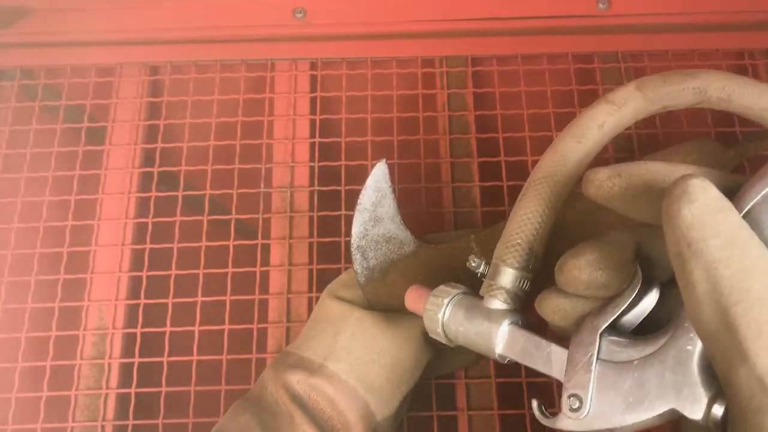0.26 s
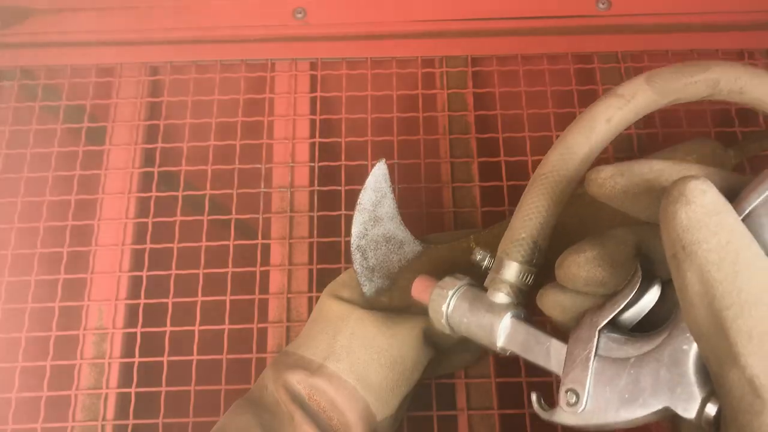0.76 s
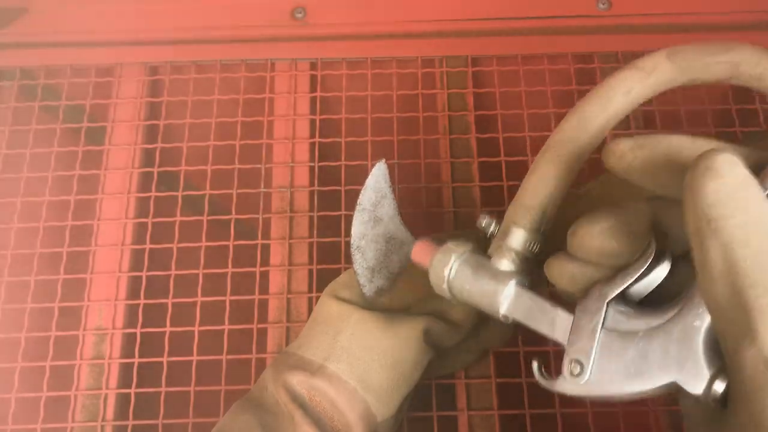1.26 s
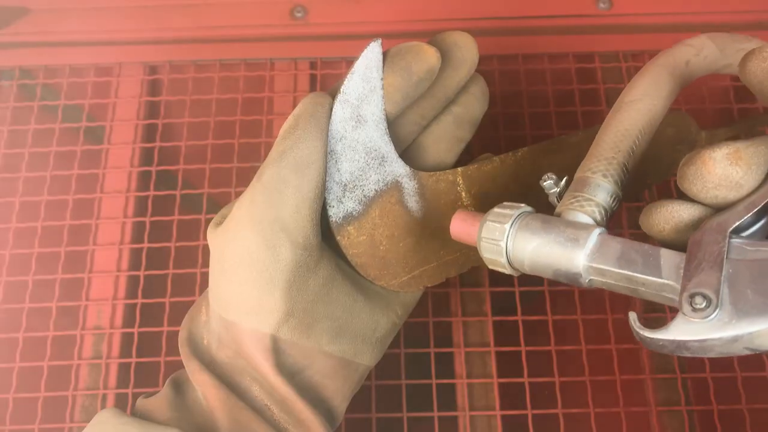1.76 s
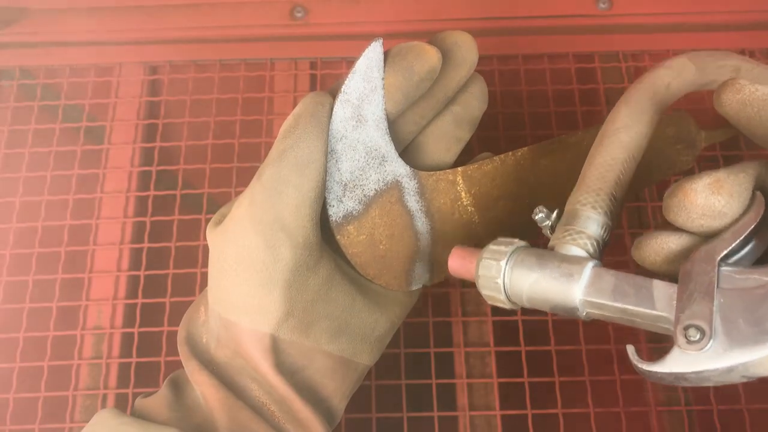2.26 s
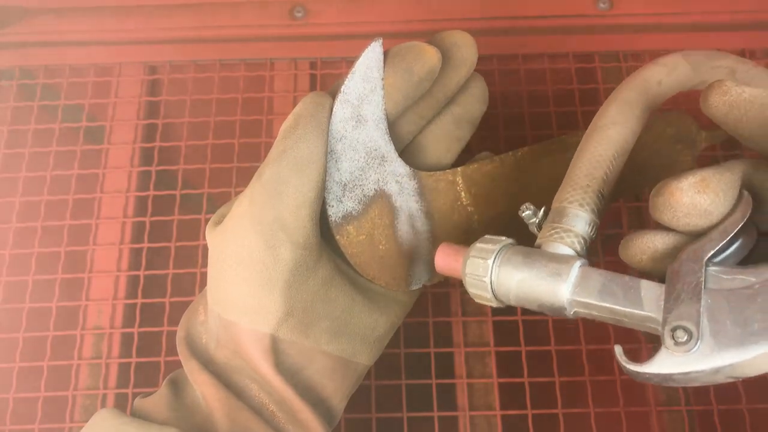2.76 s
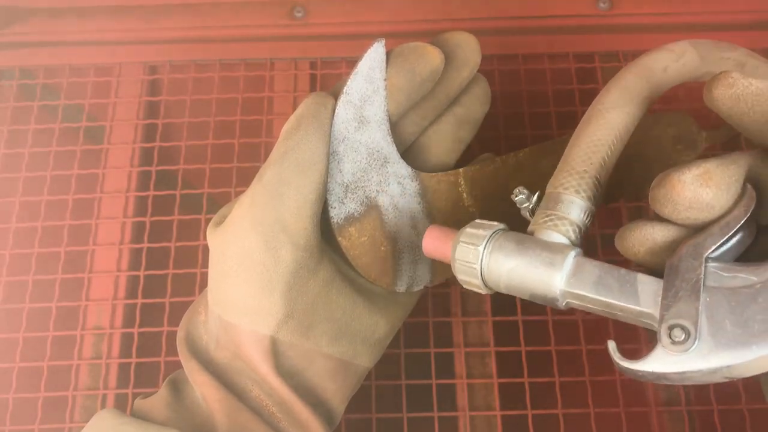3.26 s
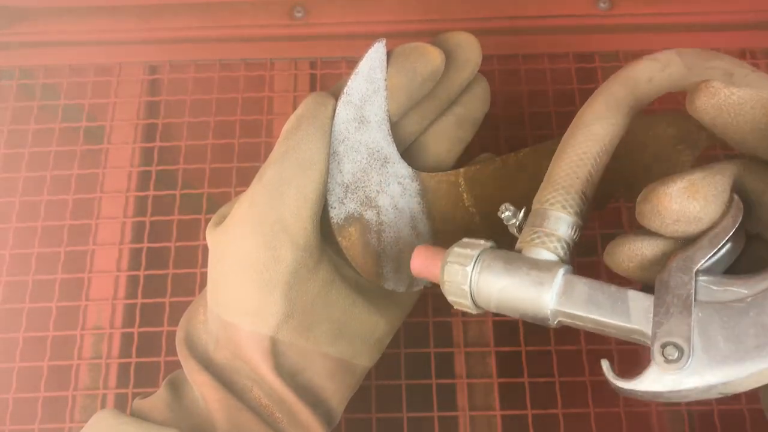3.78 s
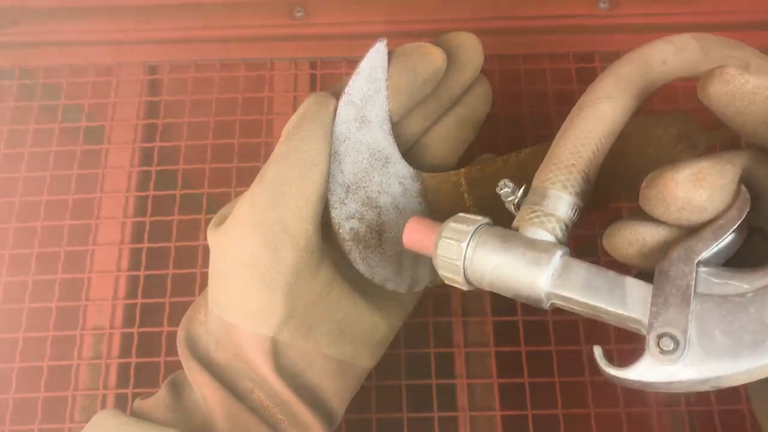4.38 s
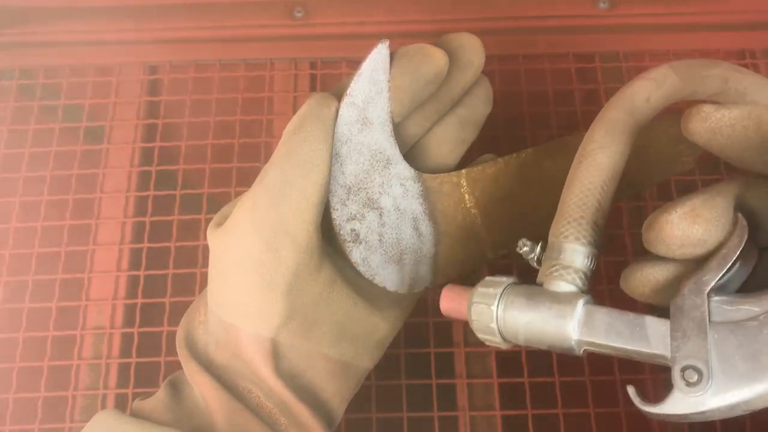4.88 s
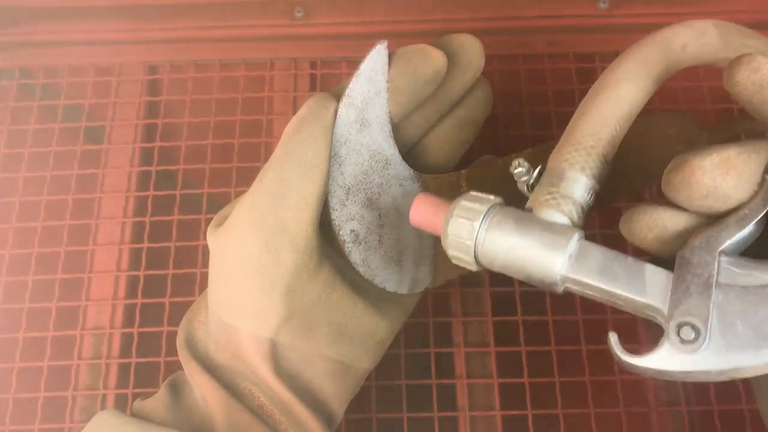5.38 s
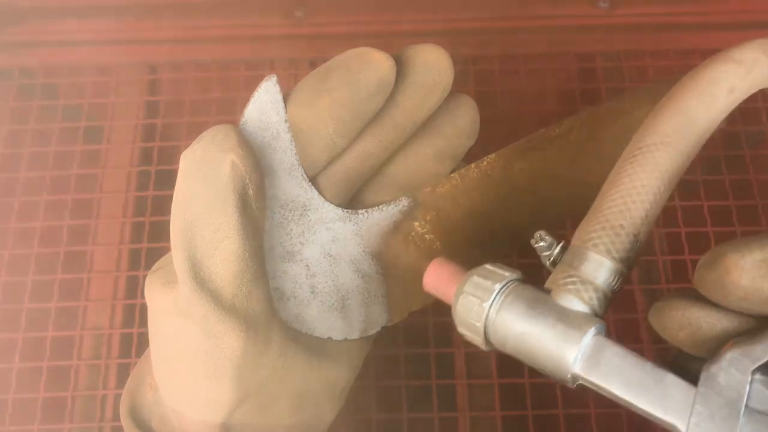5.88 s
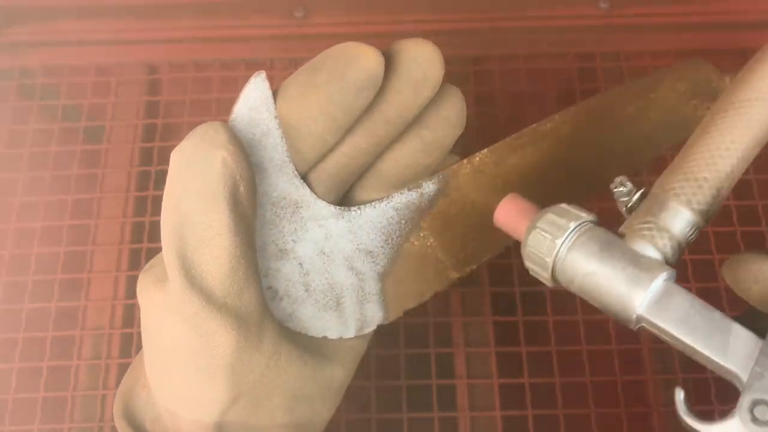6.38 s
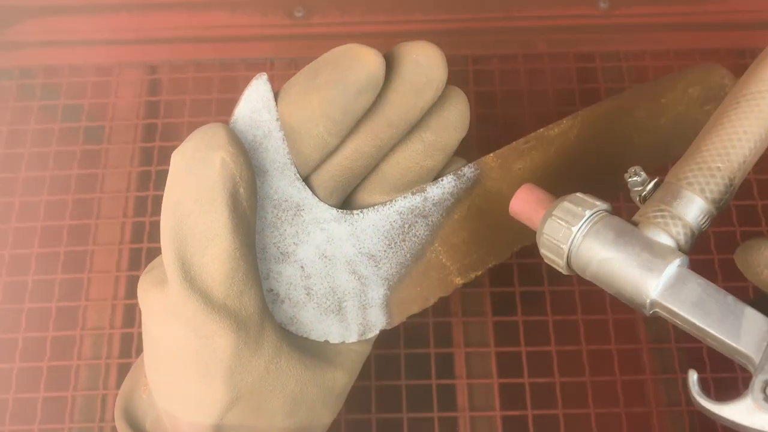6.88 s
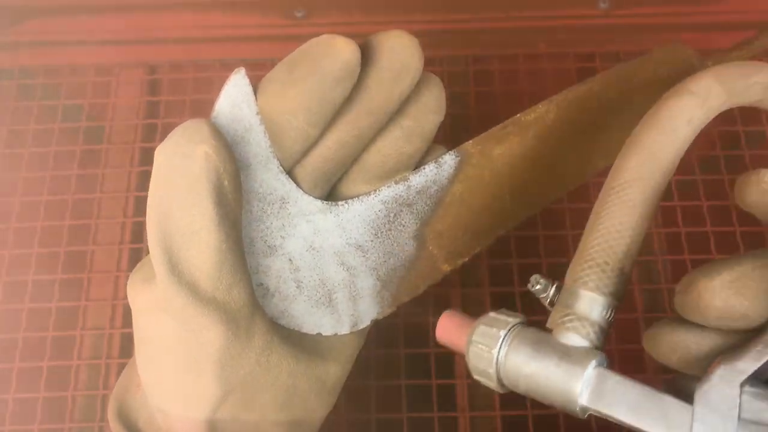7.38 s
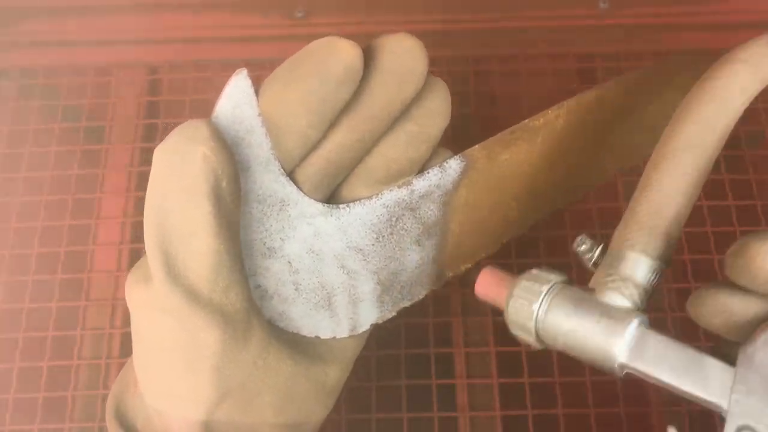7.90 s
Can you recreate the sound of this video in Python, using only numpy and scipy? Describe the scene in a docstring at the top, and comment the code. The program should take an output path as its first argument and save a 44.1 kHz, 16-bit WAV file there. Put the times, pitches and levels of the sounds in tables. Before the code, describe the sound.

Continuous sandblasting, heard close in stereo: fine high-pitched hiss with a faint metallic ring from the blade, rising and falling as the gun sweeps. Two abrupt cuts change its tone; the middle part is steadier and rings most, the last starts softer and breaks into bold swishes. Steady motor whine and hollow duct airflow fill the background of the boxy sheet-metal cabinet.

```python
"""Grit hisses in surges off a steel blade and rings it; a dust extractor and second motor whine over duct noise.
The blast is random grains through hiss colours and blade resonances, smeared by a sheet-metal cabinet.
The motors are sine tones; the duct is noise shaped by a curve and pipe resonances.
The blade is held in three grips joined by hard edits, and two microphone ports hear it all."""
import sys
import numpy as np
from scipy import signal
from scipy.fft import rfft, irfft, next_fast_len
from scipy.io import wavfile
from scipy.ndimage import uniform_filter1d

SR = 44100
rng = np.random.default_rng(int(sys.argv[2]) if len(sys.argv) > 2 else 0)


def file_out(sig):
    """Save sig as 16-bit WAV at sys.argv[1]."""
    # one column per channel
    cols = np.atleast_2d(sig).T
    # limit, then scale
    lim = np.clip(cols, -1, 1)
    pcm = np.round(lim * 32767).astype(np.int16)
    wavfile.write(sys.argv[1], SR, pcm)


def linear_from_db(decibels):
    """Turn decibels (scalar or array-like) into linear amplitude factors; 0 gives 1."""
    return 10 ** (np.asarray(decibels, float) / 20)


N = 358974
TIME = np.arange(N) / SR
SIZE = next_fast_len(N)
HZ = np.arange(SIZE // 2 + 1) * SR / SIZE + 1e-3  # offset keeps log(HZ) finite

# hard edits between grips: time_s
EDITS_S = (1.508, 5.668)
GRIP = np.searchsorted(EDITS_S, TIME)  # grip index 0, 1, 2 at every sample

# hiss colour, one list per grip: pitch_hz, relative_density_db
HISS_COLOURS = [
    [(1530, -45), (2600, -23), (2700, -23), (4000, -16.5), (4780, -15.5), (6060, -11), (6830, -12.5),
     (7190, -5.5), (7690, -11.5), (9800, -2.5), (11900, 0.5), (13900, -1.5), (15400, -11.5)],
    [(1530, -45), (2600, -24), (2820, -23), (3040, -29), (3530, -26), (4610, -9.5), (5190, -10), (5670, -9),
     (6580, -6), (7640, -9.5), (9680, -4), (11700, 1.5), (15400, -5.5)],
    [(1530, -45), (2600, -19), (4030, -10.5), (5190, -9), (5670, -6), (6110, -7.5), (6730, -4.5),
     (7640, -5.5), (9330, -2.5), (11500, 2), (12800, 2), (13900, 3), (15400, -8)],
]
# blade resonances, one list per grip: pitch_hz, width_hz, relative_level_db (before the low cut)
BLADE_MODES = [
    [(5550, 51, -19), (7400, 150, -7), (8150, 33, -8), (9100, 48, -6), (9350, 51, -8), (9600, 220, -3),
     (10100, 110, -6), (10900, 100, -3), (10400, 120, -8), (11260, 48, 0), (12050, 130, 1), (12400, 43, -3),
     (13600, 54, -10), (14900, 93, -2)],
    [(5230, 150, -17), (5860, 36, 2), (6510, 41, 4), (6750, 40, 2.5), (7271, 45, 2), (7640, 100, -17),
     (7940, 56, -6.5), (9940, 96, 1.5), (11330, 92, 0.5), (12050, 98, 2), (12900, 80, -1), (13260, 80, 1),
     (13800, 70, 4.5), (14783, 70, -3)],
    [(5450, 130, -14), (5830, 160, -5), (6700, 300, -7), (7250, 63, 4), (8900, 96, -4), (9660, 45, 8.5),
     (10600, 42, -5), (11000, 50, 9), (11930, 300, 3), (12800, 120, -8), (13700, 330, -10), (14500, 49, -5),
     (14800, 120, -2)],
]
# mean ring level re hiss, one value per grip: level_db
RING_LEVELS_DB = [-9, -3.5, -9]


def blast():
    """Grit hisses off the blade and rings it; each grip has its own hiss colour and modes."""
    crossover_hz, flutter_db, flutters_per_s = 7880, 0.83, 25
    ring_rise_per_bite = 0.28  # extra ring dB re hiss per dB of stream level
    flutter = linear_from_db(flutter_db * walk(flutters_per_s))
    high_db, bite_db = stream()
    low_pass = 1 / (1 + (HZ / crossover_hz) ** 8)
    low_cut = colour([(3000, -34), (5000, 0)])
    out = np.zeros((2, N))
    for k in range(3):
        held = GRIP == k
        ring = ports(grains(), grains(), resonances(BLADE_MODES[k]) * low_cut)
        ring_db = RING_LEVELS_DB[k] + ring_rise_per_bite * (bite_db - bite_db[held].mean())
        hiss = spray(colour(HISS_COLOURS[k]))
        spectrum = rfft(hiss + linear_from_db(ring_db) * ring, SIZE)
        for band_gain, level_db in ((low_pass, bite_db), (1 - low_pass, high_db)):
            band = irfft(spectrum * band_gain, SIZE)[:, :N]
            band_rms = np.std(band.mean(axis=0)[held])
            out += held * flutter * linear_from_db(level_db) * band / band_rms
    return out


# grit level as the gun drifts nearer and farther, before sweeps: time_s, above_crossover_db, below_crossover_db
STREAM_DRIFT = [(0, -28.5, -40), (.5, -29.5, -41), (.8, -28.5, -41), (1.1, -27.5, -40.5), (1.5, -29, -40.5),
                (1.7, -32, -42.5), (2.15, -30, -46), (2.6, -29, -37.5), (2.95, -29.5, -44.5),
                (3.12, -30, -37.5), (3.38, -28, -39), (3.46, -29, -43), (3.8, -27, -40), (4.25, -26, -37.5),
                (4.8, -28, -39.5), (4.95, -28.5, -43.5), (5.2, -28, -37.5), (5.33, -26, -36.5),
                (5.6, -27.5, -37), (5.93, -34, -44.5), (6.03, -29, -40.5), (6.35, -31, -44),
                (7.1, -30.5, -44.5), (8.14, -31, -45)]
# level changes as the gun sweeps across the blade: peak_s, half_length_s, above_rise_db, below_rise_db
GUN_SWEEPS = [(0, 0.084, 6, 4), (0.213, 0.034, 3, 3), (0.378, 0.07, 5.5, 1.5), (0.554, 0.045, 5.5, 4.5),
              (.71, .08, 4.5, 3), (0.962, 0.056, 3, 2.5), (1.068, .03, 3, 0), (1.267, .04, 3.5, 1),
              (1.532, .07, 1.5, 5.5), (2.23, 0.099, 4, 3), (3.68, 0.06, -2, 6.5), (3.75, 0.069, 3.5, 1.5),
              (4.27, .04, 2, 5.5), (4.51, 0.026, 0, 4), (5.54, .04, 2.5, 1.5), (5.847, .04, 3, 7),
              (6.236, .05, 2, 4), (6.468, 0.085, 9, 12), (6.923, 0.16, 5, 9.5), (7.238, .08, 5.5, 2.5),
              (7.437, .05, 7.5, 5.5), (7.59, 0.044, 8.5, 7), (7.737, 0.04, 9.5, 8), (7.84, .04, 1, 5),
              (7.938, 0.056, 7.5, 6), (8.075, 0.083, 3.5, 13)]


def stream():
    """Level in dB above and below the crossover: slow drift plus every sweep; the lower band also wavers."""
    rasp_db, rasps_per_s = 0.7, 14
    high_db, low_db = curve(STREAM_DRIFT)
    for peak_s, half_s, high_rise_db, low_rise_db in GUN_SWEEPS:
        shape = bump(peak_s, half_s)
        high_db = high_db + high_rise_db * shape
        low_db = low_db + low_rise_db * shape
    return high_db, low_db + rasp_db * walk(rasps_per_s)


def spray(gain):
    """One grain stream reaches the ports along two routes, the second delayed 2 ms and mixed with stray grit."""
    same_source = 0.63  # power share
    main = grains()
    delayed = np.roll(main, SR // 500)
    second = np.sqrt(same_source) * delayed + np.sqrt(1 - same_source) * grains()
    return ports(travel(main), travel(second), gain)


def grains():
    """Single grains landing at random, with random sign and a spread of sizes."""
    grains_per_s, spread_db = 20000, 1.5
    hits = rng.random(N) < grains_per_s / SR
    return hits * rng.standard_normal(N) * linear_from_db(spread_db * rng.exponential(size=N))


def travel(x):
    """The gun wanders, so the sound fades between three paths through the cabinet."""
    moves_per_s = 3.5
    weights = np.array([walk(moves_per_s) for _ in range(3)])
    weights /= np.linalg.norm(weights, axis=0)  # constant total power
    return irfft(sum(rfft(w * x, SIZE) * cabinet() for w in abs(weights)), SIZE)


def cabinet():
    """Response of the sheet-metal box: the direct sound and a short dense tail."""
    t60_s, tail_db = 0.05, -3
    t = TIME[:SR // 4]
    tail = rng.standard_normal(len(t)) * 1000 ** (-t / t60_s)
    return 1 / np.sqrt(2) + linear_from_db(tail_db) * rfft(tail / np.linalg.norm(tail), SIZE)


# second motor's whine: time_s, pitch_hz
WHINE_PITCH = [(0, 1539), (1.2, 1537.5), (1.7, 1538), (2.8, 1536.2), (3.8, 1539), (4.6, 1538.3),
               (5.66, 1540), (5.68, 1538.3), (6.85, 1537), (7.07, 1528), (7.35, 1536), (7.7, 1539.5),
               (8.14, 1541)]
# extractor tones, before the machine level curve: shaft_multiple, grip_1_db, grip_2_db, grip_3_db
SHAFT_TONES = [(1, -55.5, -59.5, -59.5), (2, -55.5, -55, -56), (3, -61.5, -78, -77.5), (4, -52.5, -64, -60),
               (5, -51, -51, -51.5), (7, -52.5, -50.5, -49.5), (8, -49.5, -50, -51),
               (9, -52.5, -57.5, -58.5), (10, -60, -68, -62), (12, -52, -57, -63), (13, -59, -59.5, -56.5),
               (14, -65, -75, -62), (15, -48.5, -51.5, -52.5), (16, -44.5, -44.5, -46), (17, -59, -65, -76),
               (20, -59, -71, -74), (26, -64, -60, -60), (28, -53, -60, -61.5)]
# stereo place of each extractor tone: left_minus_right_db, left_lead_rad
TONE_PLACES = [(.2, -.46), (-.4, -.3), (-1.8, -.2), (1, .6), (-.5, -.5), (-.3, -.9), (-1.2, -1), (1.5, -.6),
               (-5.4, .6), (-5, -.7), (-2, 1.8), (3, 1.3), (-5.5, 2.5), (-6.5, .95), (-4, 1.4), (-3, .4),
               (-.4, .2), (-1, -.3)]
# cycle offset, rows extractor and second motor: grip_1_turns, grip_2_turns, grip_3_turns
CYCLE_OFFSETS = [(0, .47, .9), (0, 0.055, 0.53)]


def motors():
    """Sines on multiples of the extractor shaft, and the lone whine of the second motor."""
    shaft_hz, climb_hz_per_s = 138.72, .066
    sag_s, sag_half_s, sag_hz = 7.03, .2, .32
    whine_db, whine_lead_rad = -39, -.8
    waver_db, wavers_per_s = -0.04, 6
    side = np.array([[.5], [-.5]])  # left, right
    speed_hz = shaft_hz + climb_hz_per_s * TIME - sag_hz * bump(sag_s, sag_half_s)
    shaft = cycle(speed_hz, CYCLE_OFFSETS[0])
    whine = cycle(curve(WHINE_PITCH)[0], CYCLE_OFFSETS[1])
    out = linear_from_db(whine_db) * np.sin(whine + side * whine_lead_rad)
    for (multiple, *grip_db), (pan_db, lead_rad) in zip(SHAFT_TONES, TONE_PLACES):
        level_db = np.array(grip_db)[GRIP] + waver_db * walk(wavers_per_s) + side * pan_db
        start_rad = 2 * np.pi * rng.random()
        out = out + linear_from_db(level_db) * np.sin(multiple * shaft + start_rad + side * lead_rad)
    return np.sqrt(2) * out  # sine levels are rms


def cycle(hz, offset_turns):
    """Phase in radians of a turning machine, skipping at each edit."""
    return 2 * np.pi * (np.cumsum(hz) / SR + np.array(offset_turns)[GRIP])


# duct air colour: pitch_hz, relative_density_db
DUCT_COLOUR = [(20, -50), (60, -45), (105, -41), (150, -29.5), (200, -20.5), (375, -14.5), (470, -6),
               (560, -7), (650, -14), (1090, -9.5), (1350, -13), (1560, -12.5), (1790, -16), (2260, -16),
               (2520, -21.5), (4500, -16.5), (6500, -23.5)]
# pipe resonances over that colour: pitch_hz, width_hz, level_db
PIPE_MODES = [(305, 4.8, 5.8), (482, 25, 6.4), (505.6, 28, 10.7), (822, 40, 5.9), (916, 16, 2.6),
              (1070, 90, 3), (1250, 36, 3.7), (1970, 45, 3.3), (2640, 30, 4.7), (2790, 29, 9.2)]


def duct():
    """Rushing air as coloured noise, raised at the pipe resonances."""
    level_db = -37
    gain = colour(DUCT_COLOUR) * np.sqrt(1 + resonances(PIPE_MODES) ** 2)
    return linear_from_db(level_db) * ports(*rng.standard_normal((2, N)), gain)


# port pair, before the hollows: pitch_hz, likeness_0_to_1, left_lead_rad, left_minus_right_db
PORT_PAIR = [(100, .9, -.45, 0), (330, .87, -.3, -.5), (430, .55, .2, -3), (480, .9, .1, -2.8),
             (620, .8, -.1, -.5), (820, .92, -.2, 0), (1000, .82, -.8, 0), (1400, .5, -.7, -1.5),
             (1750, .25, -.8, -1), (1950, .15, 2.6, 3), (2200, .4, 1.3, -4), (2900, .25, 0, -1),
             (3400, .08, 0, 0), (3900, .45, 0, -.5), (5900, .35, -.4, 0), (7200, .35, -1.2, 0),
             (8500, .45, -2.5, -1), (9000, .4, -4.6, -1.5), (10400, .42, -6.5, -1.5),
             (11400, .55, -6, -1.5), (12200, .2, -6.9, -3), (14000, .35, -6.2, -4.5),
             (15800, .35, -3.9, -6)]
# bands where the ports hear opposite signs and their sum thins: pitch_hz, width_hz, depth_db
SUM_HOLLOWS = [(2564, 80, -4.5), (2940, 100, -4.5), (3765, 56, -8), (4280, 32, -9), (4800, 32, -4),
               (5230, 88, -7), (7440, 110, -8.5)]


def ports(shared, other, gain):
    """Colours two streams and shares them between the ports; the mean of both ports has rms 1."""
    hz, *columns = np.transpose(PORT_PAIR)
    like, lead_rad, pan_db = [np.interp(HZ, hz, c) for c in columns]
    a = np.sqrt(1 + like) * rfft(shared, SIZE)
    b = np.sqrt(1 - like) * rfft(other, SIZE)
    left = linear_from_db(pan_db / 2) * np.exp(.5j * lead_rad) * (a + b)
    right = linear_from_db(-pan_db / 2) * np.exp(-.5j * lead_rad) * (a - b)
    # the port sum keeps the asked colour apart from the hollows
    centre = np.sqrt(linear_from_db(pan_db) + linear_from_db(-pan_db) + 2 * like * np.cos(lead_rad))
    thin_db = sum(db / (1 + (2 * (HZ - pitch_hz) / width_hz) ** 2) for pitch_hz, width_hz, db in SUM_HOLLOWS)
    lost = (1 - linear_from_db(thin_db)) * (left + right) / 2
    out = irfft(np.array([left - lost, right - lost]) * gain / centre, SIZE)[:, :N]
    return out / np.std(out.mean(axis=0))


def curve(table):
    """Columns of a table interpolated over time."""
    s, *columns = np.transpose(table)
    return [np.interp(TIME, s, c) for c in columns]


def colour(points):
    """Gain at every frequency from (Hz, dB) points; flat beyond the ends."""
    hz, db = np.transpose(points)
    return linear_from_db(np.interp(np.log(HZ), np.log(hz), db))


def resonances(modes):
    """Summed power response of (Hz, width Hz, dB) modes, as a gain."""
    return np.sqrt(sum(linear_from_db(2 * db) / (1 + (2 * (HZ - hz) / width_hz) ** 2) for hz, width_hz, db in modes))


def walk(rate_hz):
    """Random levels held 1 / rate_hz seconds and smoothed twice; spread near 1."""
    k = int(SR / rate_hz)
    held = np.repeat(rng.standard_normal(N // k + 1), k)
    return 1.2 * uniform_filter1d(uniform_filter1d(held, k), k)[:N]


def bump(peak_s, half_s):
    """Rises straight to 1 at peak_s and falls back as fast."""
    return np.clip(1 - abs(TIME - peak_s) / half_s, 0, 1)


# level of all machine sound, dipping after each edit: time_s, level_db
MACHINE_LEVEL = [(0, 0), (1.5, 0.1), (1.53, -3.5), (1.8, -1), (2.2, 0.57), (5.6, 0.45), (5.8, -1.5),
                 (6.2, 0.5), (8.14, 0.5)]


def scene():
    """The blast over the machines."""
    machines = motors() + duct()
    return blast() + linear_from_db(curve(MACHINE_LEVEL)[0]) * machines


def roll_off(x):
    """The treble ends steeply here."""
    return signal.sosfilt(signal.butter(12, 16150, fs=SR, output="sos"), x)


def record(dry):
    """Cuts everything from top_hz up, as a brick-wall low-pass."""
    top_hz = 15720
    mix = irfft(rfft(dry, SIZE) * (HZ < top_hz), SIZE)[:, :N]
    return roll_off(mix)


dry = scene()
out = record(dry)
file_out(out)
```